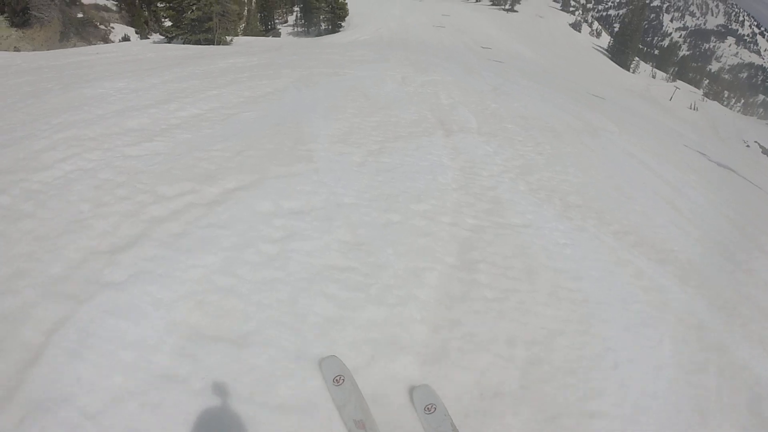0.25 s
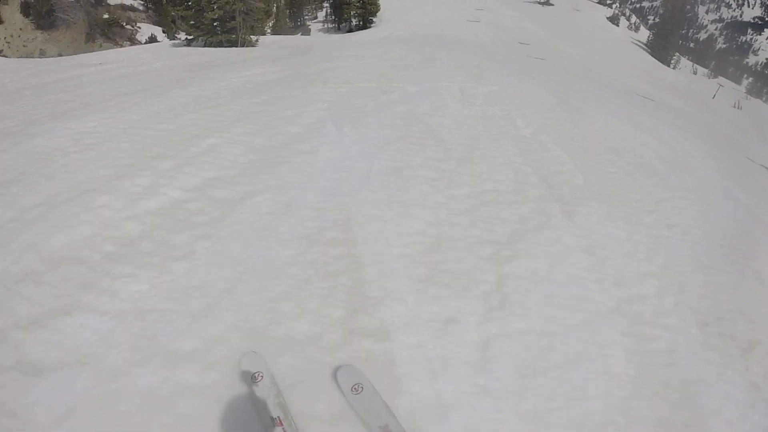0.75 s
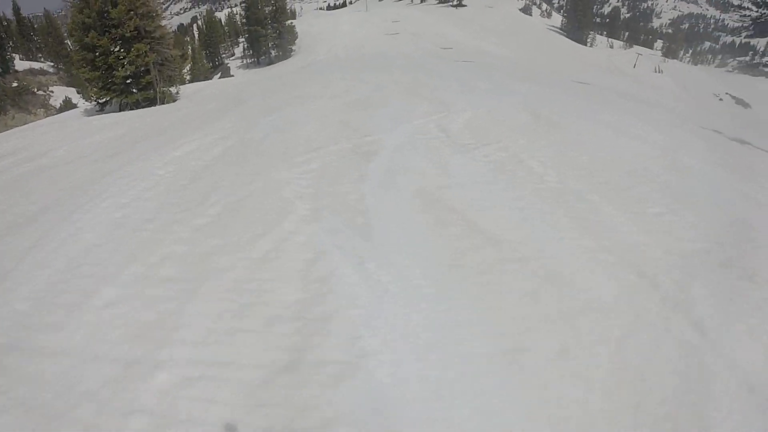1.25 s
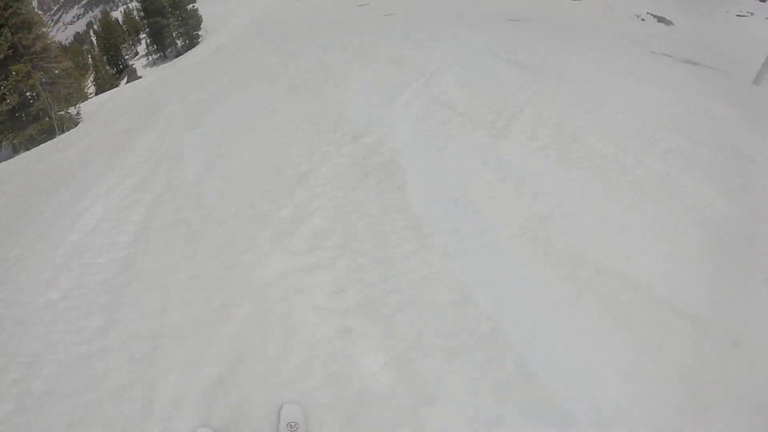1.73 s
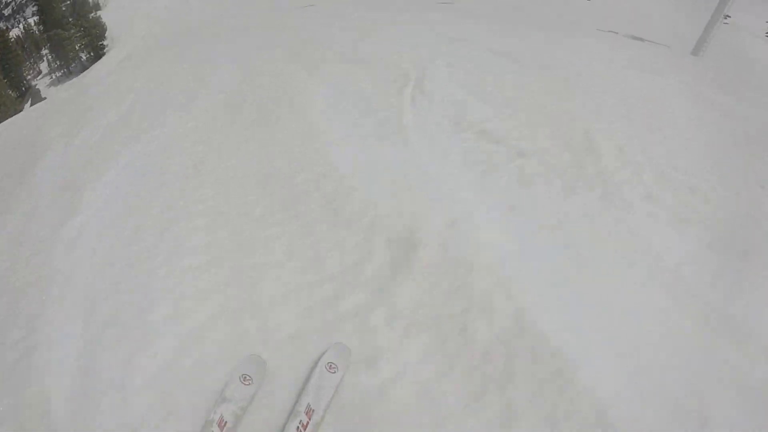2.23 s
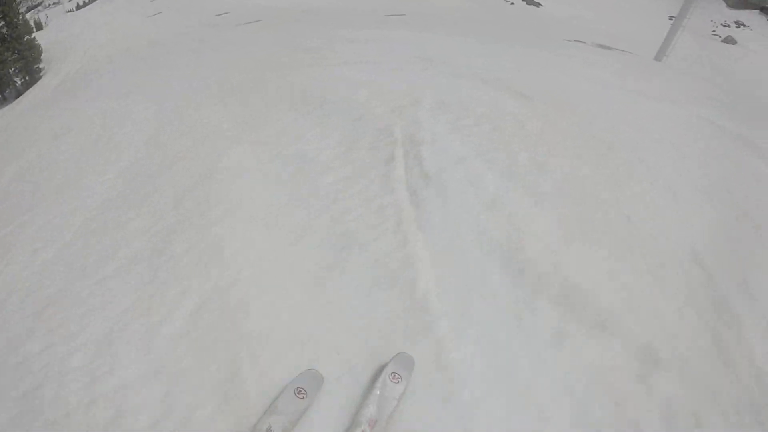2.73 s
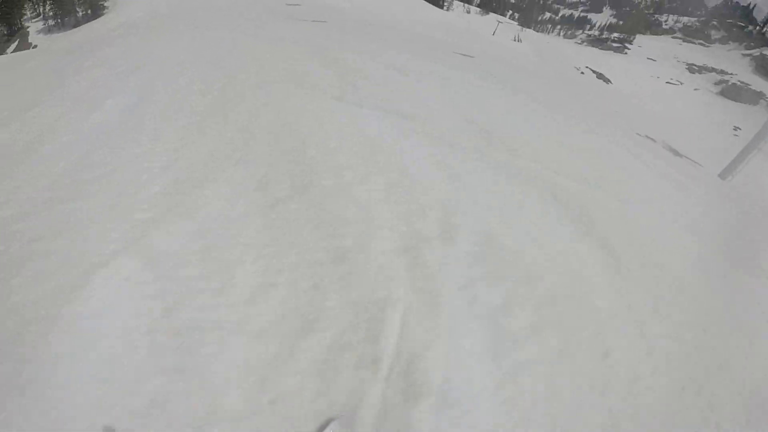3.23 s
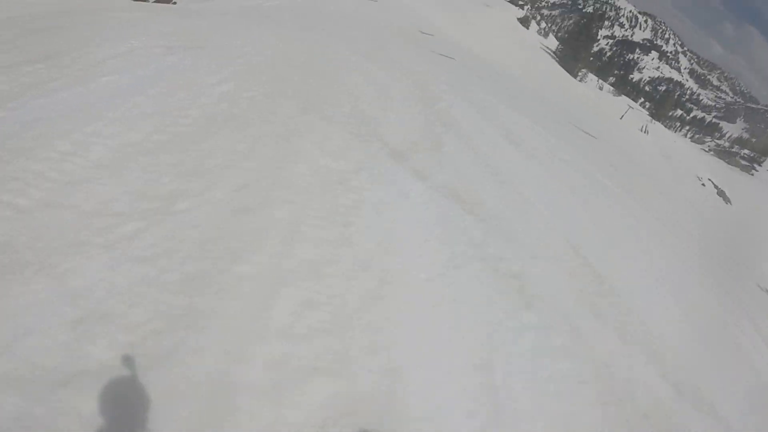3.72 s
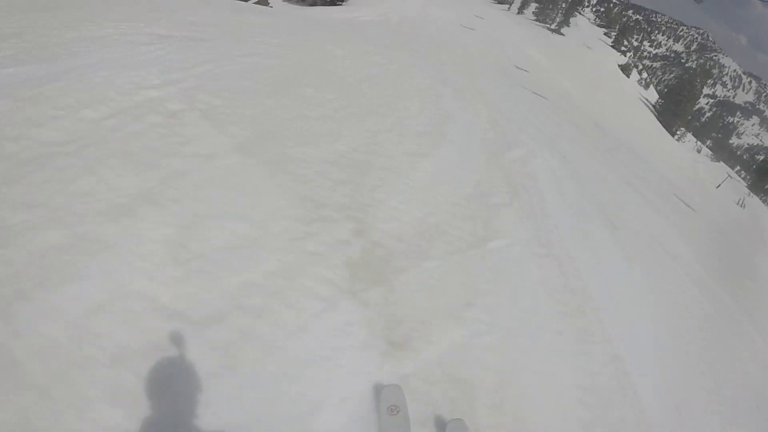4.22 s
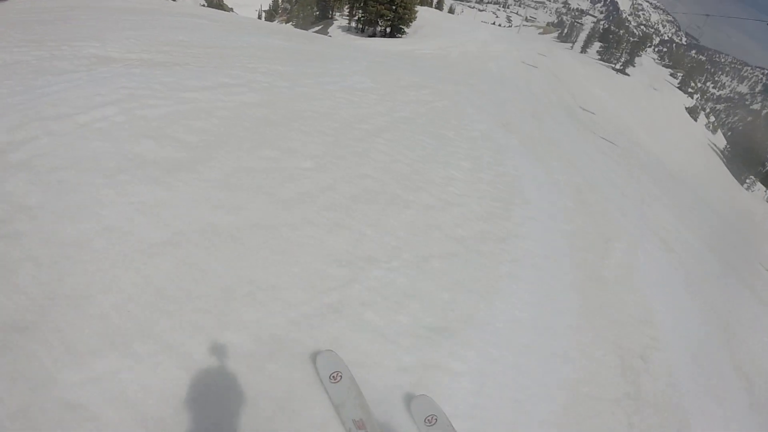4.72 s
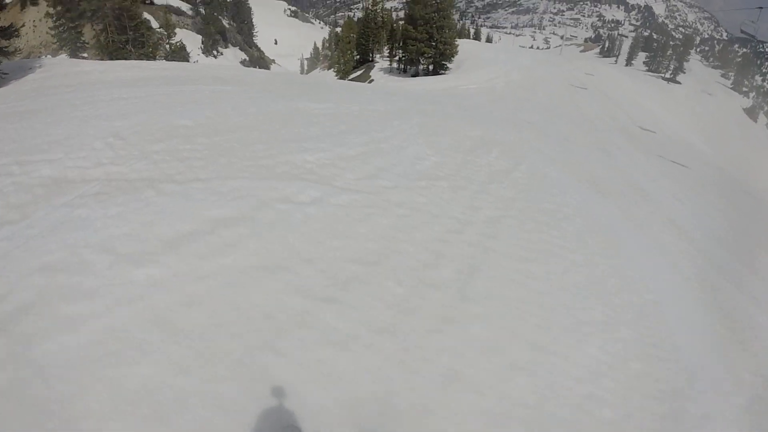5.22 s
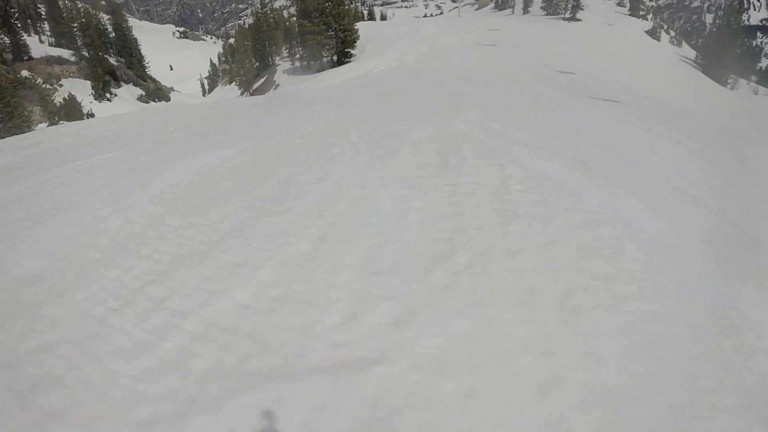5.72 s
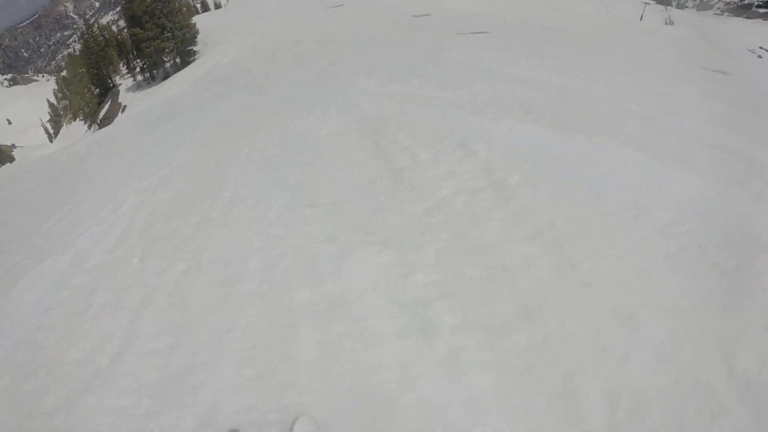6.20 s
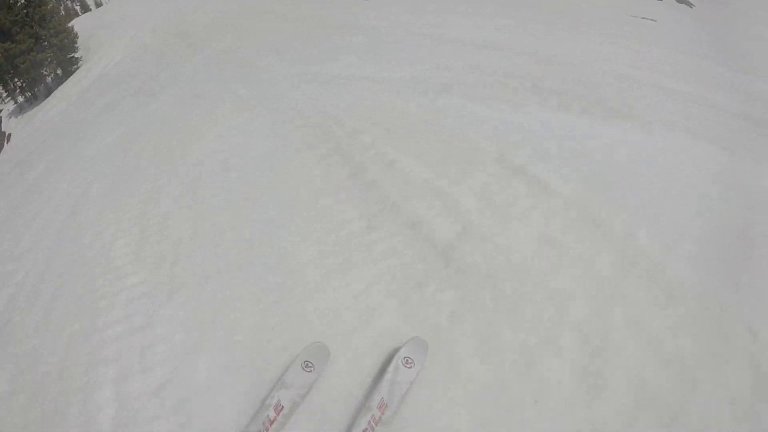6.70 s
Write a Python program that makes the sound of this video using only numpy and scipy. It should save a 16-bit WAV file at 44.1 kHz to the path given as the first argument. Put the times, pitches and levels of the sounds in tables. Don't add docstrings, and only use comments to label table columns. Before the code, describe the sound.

Skis carve wet spring snow on an open mountain slope, heard from a helmet microphone in a closed housing. The gritty, watery hiss swells with each turn and fades between. Low wind flutters throughout. A dense burst of hard clacks, a dull blow, a snap and knocks comes around two seconds; two duller blows follow after four, and one last hard clack near six.

```python
import sys
import numpy as np
from scipy import signal
from scipy.fft import rfft, irfft, next_fast_len
from scipy.io import wavfile
from scipy.ndimage import uniform_filter1d, map_coordinates

SR = 44100
rng = np.random.default_rng(int(sys.argv[2]) if len(sys.argv) > 2 else 0)


def field_ratio(decibels):
    return 10 ** (np.asarray(decibels, dtype=float) / 20)


def to_wav(s):
    ch = np.atleast_2d(s).T
    pcm = np.round(np.clip(ch, -1, 1) * 32767)
    wavfile.write(sys.argv[1], SR, pcm.astype(np.int16))


N = 306495


def skis():
    # t/s, carve level/dB
    load = [(0.0, -47), (0.62, -45.5), (0.9, -58.5), (1.35, -62), (1.8, -55.5), (2.12, -48), (2.68, -44.5),
            (2.92, -50.5), (3.17, -57), (3.6, -61), (4.05, -53.5), (4.74, -40), (4.9, -44.5), (5.12, -47.5),
            (5.4, -56.5), (5.85, -61.5), (6.35, -52), (6.8, -48.5)]
    # t/s, extra spray level/dB
    wetness = [
        (0.25, -1.5),
        (0.75, 4.5),
        (1.1, -3),
        (1.5, 1),
        (2.3, -3),
        (2.9, -1),
        (3.6, 0.3),
        (4.9, 3),
        (5.4, -1),
        (6.9, 2),
    ]
    # f/Hz, level per Hz/dB
    carve_spectrum = [(300, -9), (600, -10.5), (900, -7), (1400, 1), (2500, -1.5), (4000, -17), (7000, -18),
                      (15000, -37)]
    spray_spectrum = [(1500, -26), (3000, 0.5), (5000, -5), (7800, -11.5), (11200, -15), (15500, -22.5)]
    drone_spectrum = [(40, -12.5), (80, -0.5), (150, -2), (300, -10.5), (600, -8.5), (1500, -22.5),
                      (4000, -40)]

    carve_db, = curves(load)
    load_db = carve_db + 52
    spray_db = -56 + 0.85 * load_db + curves(wetness)[0]
    drone_db = -56.5 + 0.05 * load_db
    ruts = wobble(18) + 0.4 * wobble(50)
    shake_db = 1.1 * ruts

    squelch = bubbles(rate=600, centre_hz=1864, octaves=0.686, cycles=4.1, spread_db=3)
    shear = patchy(depth_db=2.2) + 0.36 * crackle(rate=2100, spread_db=0.5) + 0.22 * squelch
    carve = coloured(shear, carve_spectrum)
    droplets = patchy(depth_db=0.9) + 0.35 * crackle(rate=2000, spread_db=1.0)
    spray = coloured(droplets, spray_spectrum)

    turn_s, right_apex_s, mist_db, mist_hz = 2.06, 2.8, 2.8, 7800
    lean = np.cos(np.pi * (np.arange(N) / SR - right_apex_s) / turn_s)
    mist = signal.sosfiltfilt(signal.butter(2, mist_hz, "high", fs=SR, output="sos"), spray)
    spray = spray + (field_ratio(mist_db * lean) - 1) * mist

    drone = coloured(patchy(depth_db=0.0), drone_spectrum)
    out = field_ratio(carve_db + 1.5 + shake_db) * carve
    out += field_ratio(spray_db + 2.08 + 0.9 * shake_db) * spray
    return out + field_ratio(drone_db + 1.9 * wobble(12)) * drone


def bubbles(rate, centre_hz, octaves, cycles, spread_db):
    draw = rng.random((int(rate * N / SR), 2))
    hz = centre_hz * 2 ** (octaves * rng.standard_normal(len(draw)))
    hz = np.clip(hz, 400, 9000)[:, None]
    turns = np.arange(600) / SR * hz
    wave = np.sin(2 * np.pi * turns) * turns / cycles * np.exp(-2 * turns / cycles)
    size = field_ratio(-spread_db * np.log(1 - 0.97 * draw[:, 1:]))
    where = (draw[:, :1] * N).astype(int) + np.arange(turns.shape[1])
    return unit(np.bincount(where.ravel(), (size * wave).ravel())[:N])


def clacks():
    # t/s, peak level/dB, tick level/dB, mount ring level/dB
    strikes = [
        (1.6598, -5, -45, -15),
        (1.7678, -4.5, -41, -17.5),
        (5.912, -3.3, -37, -16.5),
    ]
    # f/Hz, level/dB, t60/s
    shell = [(570, -29, .03), (700, -23, .025), (990, -5.5, 0.013), (1260, -8, 0.012), (1660, -.5, .013),
             (1880, .5, .013), (2280, -3, 0.011), (2680, 2.5, 0.011), (4000, -21, 0.02), (3430, -2, 0.0098),
             (4780, -12.5, 0.0097)]
    # f/Hz, level/dB, t60/s
    tube = [(1911, -5, .17), (2116, 0, .12), (2729, -9, .06), (2891, -13, .055), (3343, -16, .09),
            (5093, -22, .08)]
    out = np.zeros(N)
    for s, db, tick_db, mount_db in strikes:
        add(out, s + 0.00034, jolt(mount_db, push_db=0.5))
        add(out, s, field_ratio(db) * ring(shell, rise=0.00105))
        add(out, s, field_ratio(db - 26) * ring(tube, rise=0.001))
        add(out, s + 0.0082, field_ratio(db - 8) * puff(low_hz=1100, high_hz=2700, rise=0.002, t60=0.0085))
        add(out, s, field_ratio(tick_db) * puff(low_hz=5500, high_hz=8500, rise=0.0004, t60=0.011))
    return out


def blows():
    # t/s, peak level/dB, lower mode level/dB, tube ring level/dB, mount ring level/dB
    hits = [
        (1.8409, -2, 4, -29, -30.5),
        (4.1646, 0, 1, -30.5, -24),
        (4.528, -3.5, 5.5, -37, -22),
    ]
    # f/Hz, level/dB, t60/s
    grip = [(1380, 4, 0.012), (1946, -7.5, 0.0073), (2330, -11.5, 0.0078), (3210, -20, .014),
            (3630, -19.5, 0.011)]
    out = np.zeros(N)
    for s, db, low_db, tube_db, mount_db in hits:
        low_modes = [(690, -28, 0.042), (895, -39, 0.0092), (1030, low_db, 0.0098)]
        tube = [(1911, -9, 0.18), (2121, 0, 0.085)]
        add(out, s + 0.0004, jolt(mount_db + 1.5, push_db=4))
        add(out, s, field_ratio(db + 1.6) * ring([*low_modes, *grip], rise=0.0012))
        add(out, s, field_ratio(db + tube_db) * ring(tube, rise=0.003))
        add(out, s + 0.0014, field_ratio(db - 12) * puff(low_hz=710, high_hz=2400, rise=0.0014, t60=0.024))
    return out


def knocks():
    # t/s, peak level/dB, main mode f/Hz, edge level/dB
    contacts = [(0.207, -33, 1130, -3), (1.108, -33, 2000, -8), (0.373, -21, 1900, 0),
                (1.133, -36, 1420, -9), (1.888, -31, 1000, -18), (1.905, -28, 1320, -19),
                (2.098, -36, 1090, -16), (2.223, -20, 1100, -11), (2.258, -9, 1320, 4),
                (2.262, -13, 1030, -2), (2.437, -25.5, 1340, -11), (2.479, -18, 1100, 0),
                (2.877, -26, 2000, -5), (3.004, -23.5, 1380, 3), (3.125, -41, 2250, -12),
                (3.224, -41, 2260, -14), (3.749, -28, 1500, -8), (3.757, -29, 1150, -8),
                (3.994, -15, 1300, -22), (4.56, -41, 1190, -14), (4.709, -25, 1380, 0),
                (6.025, -33.5, 1290, -20), (6.049, -41, 1340, -21), (6.385, -38, 1200, -16),
                (6.619, -28, 1680, -24), (6.632, -19, 2130, -4)]
    out = np.zeros(N)
    for s, db, hz, edge_db in contacts:
        over_db = db + 25
        t60 = max(0.011 - 0.00012 * over_db, 0.003)
        modes = [
            (0.68 * hz, -7, 0.84 * t60), (hz, 0, t60), (1950, edge_db - 9, 1.37 * t60),
            (2495, edge_db + 7.5, 0.47 * t60), (3576, edge_db + 2.5, 0.5 * t60),
            (5100, edge_db - 14, 0.48 * t60)]
        rattle_db = db - 9 + 0.35 * edge_db
        tick_db = -66 + 0.7 * over_db + 0.3 * (edge_db + 5)
        add(out, s - 0.0004, field_ratio(db + 7) * ring(modes, rise=0.0017))
        add(out, s, field_ratio(rattle_db) * puff(low_hz=780, high_hz=3800, rise=0.001, t60=2.06 * t60))
        add(out, s, field_ratio(tick_db) * puff(low_hz=4200, high_hz=14000, rise=0.0004, t60=0.0076))
    return out


def buckle_snap():
    # t/s, peak level/dB
    snap = (2.1481, -3)
    # f/Hz, level/dB, t60/s
    modes = [(1040, -7.5, 0.016), (1424, 0.5, 0.012), (1800, -13, 0.022), (2530, -8.5, 0.0095),
             (3580, -4.5, 0.0085), (4800, -21.5, 0.015), (5770, -22.5, 0.013)]
    s, db = snap
    out = np.zeros(N)
    add(out, s, -field_ratio(db) * ring(modes, rise=0.00059))
    add(out, s, field_ratio(db - 34) * puff(low_hz=5000, high_hz=14500, rise=0.0004, t60=0.011))
    return out


def splats():
    # t/s, rms level/dB, low f/Hz, high f/Hz, t60/s
    lumps = [
        (1.105, -39, 1500, 7000, .03),
        (1.116, -43, 1300, 5000, .03),
        (2.254, -25, 900, 4200, .035),
        (4.517, -28, 1500, 3800, .022),
        (3.31, -52, 1500, 6000, .05),
        (5.64, -54, 2000, 9000, .06),
        (6.63, -33, 1500, 4500, .03),
        (.371, -34, 1300, 4000, .03),
        (3.004, -34, 1000, 4800, .018),
        (2.149, -22, 1500, 3600, .035),
    ]
    out = np.zeros(N)
    for s, db, low_hz, high_hz, t60 in lumps:
        add(out, s, field_ratio(db) * puff(low_hz, high_hz, rise=0.0015, t60=t60))
    return out


def pops():
    # t/s, peak level/dB, f/Hz, t60/s
    pockets = [
        (2.5, -34, 3300, 0.027),
        (2.524, -29, 2440, 0.037),
        (2.579, -30, 1630, 0.034),
        (2.645, -37, 1380, .04),
        (2.785, -30, 1100, .05),
        (2.797, -33, 1230, 0.044),
        (2.832, -33, 1100, 0.056),
        (2.841, -32, 1050, .04),
    ]
    out = np.zeros(N)
    for s, db, hz, t60 in pockets:
        add(out, s, field_ratio(db) * ring([(hz, 0, t60)], rise=0.0023))
    return out


def thumps():
    # t/s, ring level/dB, shudder level/dB
    jolts = [(0.266, -38.5, -59), (1.889, -48, -36), (1.923, -31, -43), (2.101, -41, -41),
             (2.125, -43, -38), (2.147, -40, -43), (2.221, -32, -43), (2.257, -19, -33),
             (2.438, -32.5, -34), (2.478, -22.5, -34), (2.876, -36, -55), (3.237, -26.5, -39),
             (3.747, -27, -35), (3.993, -39, -43), (4.153, -27, -32), (4.56, -38, -39), (4.707, -34.5, -53),
             (6.222, -31, -44), (6.265, -39, -42), (6.616, -23, -35.5)]
    out = np.zeros(N)
    for s, db, shudder_db in jolts:
        add(out, s + 0.0013, jolt(db, push_db=-7))
        add(out, s, field_ratio(shudder_db + 4.5) * puff(low_hz=45, high_hz=182, rise=0.006, t60=0.095))
    return out


def jolt(db, push_db):
    u = np.arange(SR // 5) / SR / 0.0018
    push = u * (1 - u / 3) * np.exp(-u)
    mount = ring([(260, 0, 0.1), (195, -1.5, 0.045), (135, -5, 0.035)], rise=0.0015)
    return field_ratio(db + push_db + 1.5) * push - field_ratio(db - 4.5) * mount


def wind():
    # f/Hz, level per Hz/dB
    gusts = [(5, -9), (14, 4.5), (28, 1), (45, -16.5), (70, -25.5), (140, -42), (300, -74)]
    # t/s, strength level/dB
    breeze = [(0.0, -37), (0.5, -39), (0.8, -33), (1.0, -37), (1.35, -35), (1.6, -30), (2.0, -29),
              (2.4, -34), (2.7, -29), (3.0, -38), (3.6, -38.5), (4.2, -29), (4.9, -33), (5.2, -35),
              (5.7, -36.5), (6.1, -28), (6.45, -33), (6.8, -27)]
    # t/s, level/dB, half length/s
    surges = [(0.09, -28.5, .03), (0.19, -26.5, .04), (0.45, -36, .05), (0.64, -29, .07), (1.85, -21, .04),
              (1.96, -21.5, .05), (2.15, -13, .025), (2.28, -17, .04), (2.48, -16, .04), (2.69, -27, .08),
              (3.13, -29.5, .04), (3.28, -28.5, .04), (3.46, -30, .03), (3.61, -31, .03), (3.89, -32, .05),
              (4.3, -31, .06), (4.57, -25.5, .04), (4.73, -22, .03), (4.86, -31, .03), (5.19, -31, .03),
              (5.71, -31, .03), (5.96, -28, .04), (6.29, -29, .05), (6.62, -24.5, .03), (6.72, -29, .03),
              (6.95, -21, .03)]
    lumps = coloured(rng.standard_normal(N), gusts)
    power = uniform_filter1d(uniform_filter1d(lumps ** 2, size=2600), size=2600)
    strength = np.sqrt(np.abs(power) + 0.1)
    t = np.arange(N) / SR
    eddies = sum(field_ratio(db) * np.exp(-((t - s) / max(half, 0.01)) ** 2) for s, db, half in surges)
    between = field_ratio(curves(breeze)[0] - 3)
    return field_ratio(-2.17) * (between + eddies) * lumps / strength


def coloured(x, spectrum):
    # f/Hz, width/Hz, lift/dB
    housing = [(240.5, 72, 8), (1060, 108, 8.5), (1288, 730, 4.5), (1884, 73, -11.5), (2327, 138, 6),
               (2880, 170, 6), (3430, 450, 8.5), (4794, 600, 9.5), (5080, 250, -5), (5840, 400, 6.5),
               (6940, 900, 9), (8900, 370, 6), (10000, 900, 8.5), (12700, 510, 4.5)]
    m = next_fast_len(N + 8192)
    hz = np.fft.rfftfreq(m, 1 / SR)
    f, db = np.transpose(spectrum)
    source_db = np.interp(np.log(hz + 1), np.log(f), db)
    lift_db = sum(up / (1 + (2 * (hz - c) / w) ** 2) for c, w, up in housing)
    return unit(irfft(rfft(x, m) * field_ratio(source_db + lift_db), m)[:N])


def patchy(depth_db):
    z = signal.stft(rng.standard_normal(N), nperseg=512)[2]
    field = uniform_filter1d(rng.standard_normal(z.shape), size=6, axis=0)
    field = uniform_filter1d(field, size=9, axis=1)
    return unit(signal.istft(z * field_ratio(depth_db * unit(field)), nperseg=512)[1][:N])


def crackle(rate, spread_db):
    grains = (rng.random(N) < rate / SR) * rng.standard_normal(N)
    size_db = spread_db * np.minimum(rng.exponential(size=N), 3)
    return unit(grains * field_ratio(size_db))


def ring(modes, rise):
    t = np.arange(SR // 5) / SR
    tone = np.zeros(len(t))
    for k, (hz, db, t60) in enumerate(modes):
        decay = field_ratio(db - 60 * t / max(t60, 0.002))
        tone += (-1) ** k * decay * np.sin(2 * np.pi * hz * t)
    return -tone * (1 - np.exp(-(t / rise) ** 2))


def puff(low_hz, high_hz, rise, t60):
    t = np.arange(SR // 10) / SR
    band = signal.butter(3, [low_hz, high_hz], "band", fs=SR, output="sos")
    noise = unit(signal.sosfilt(band, rng.standard_normal(len(t))))
    return noise * (1 - np.exp(-t / rise)) * field_ratio(-60 * t / t60)


def wobble(rate):
    knots = rng.standard_normal(int(N * rate / SR) + 4)
    return map_coordinates(knots, [np.arange(N) * rate / SR])


def curves(rows):
    s, *cols = np.transpose(rows)
    return [np.interp(np.arange(N) / SR, s, c) for c in cols]


def unit(x):
    return x / np.sqrt(np.mean(x ** 2) + 1e-20)


def add(out, s, x):
    part = out[round(s * SR):][:len(x)]
    part += x[:len(part)]


def scene():
    contacts = clacks() + blows() + knocks() + buckle_snap() + splats() + pops()
    return (skis() + contacts + thumps() + wind())[None]


def top_cut(x):
    return signal.sosfilt(signal.butter(12, 16480, fs=SR, output="sos"), x)


def record(dry):
    rounded = dry / (1 + np.abs(dry / 1.35) ** 5) ** (1 / 5)
    passed = np.fft.rfftfreq(N, 1 / SR) < 15300
    banded = irfft(rfft(rounded) * passed, N)
    return top_cut(np.clip(banded, -1, 1))


dry = scene()
out = record(dry)
to_wav(out)
```